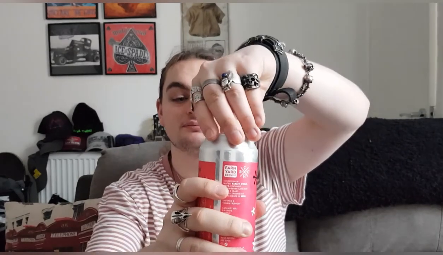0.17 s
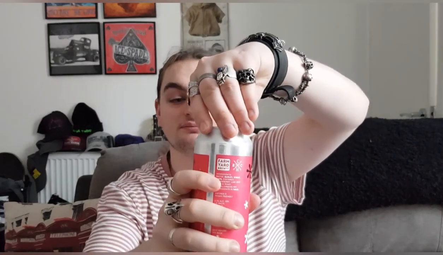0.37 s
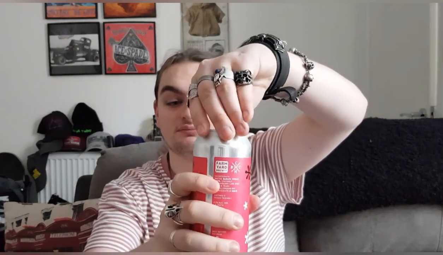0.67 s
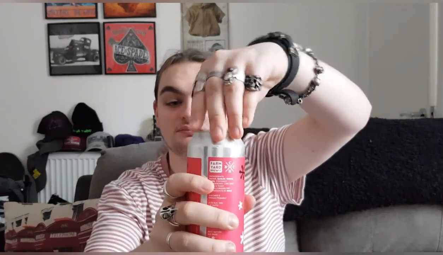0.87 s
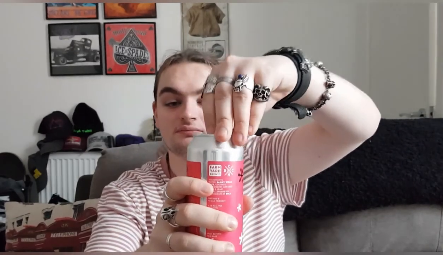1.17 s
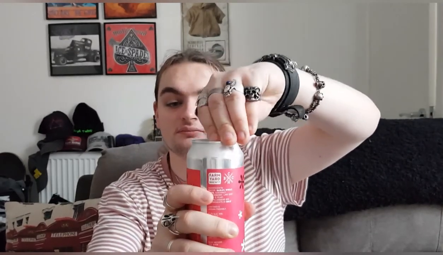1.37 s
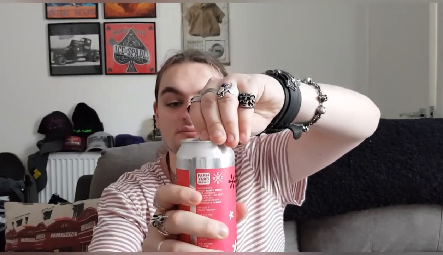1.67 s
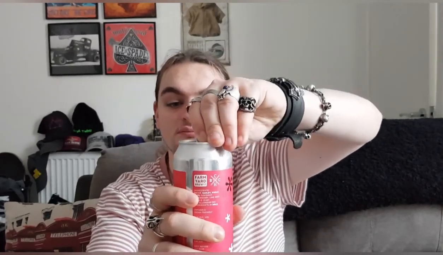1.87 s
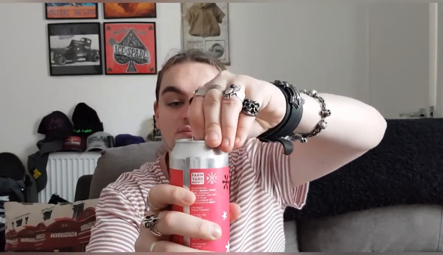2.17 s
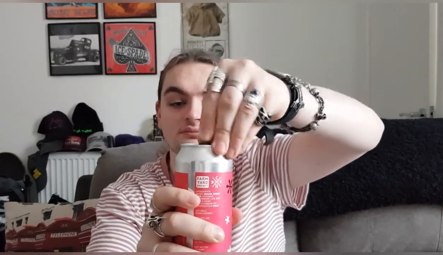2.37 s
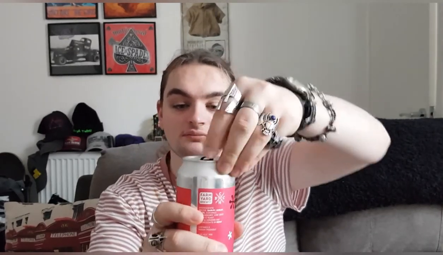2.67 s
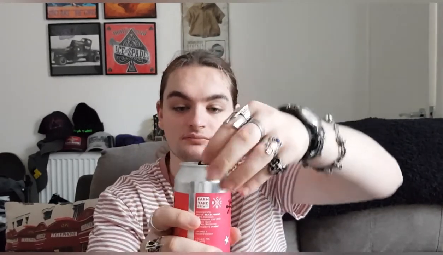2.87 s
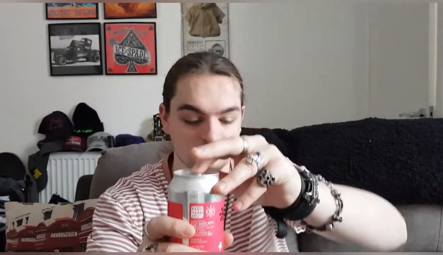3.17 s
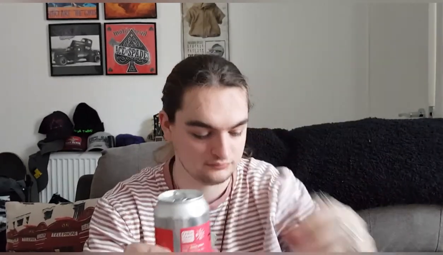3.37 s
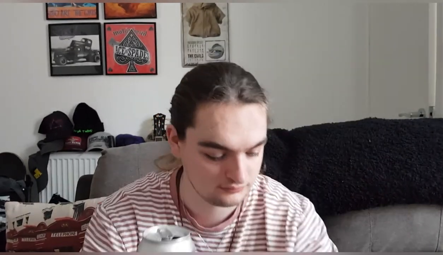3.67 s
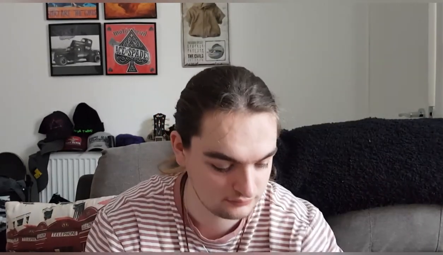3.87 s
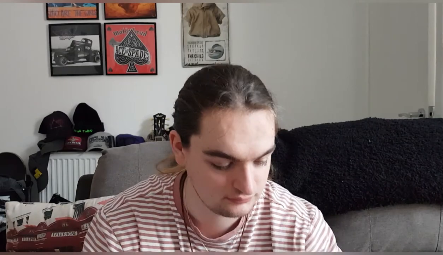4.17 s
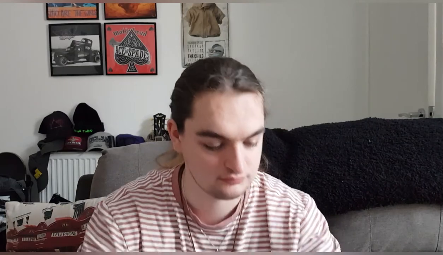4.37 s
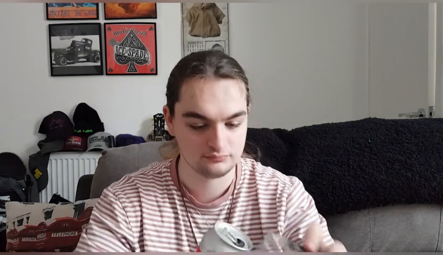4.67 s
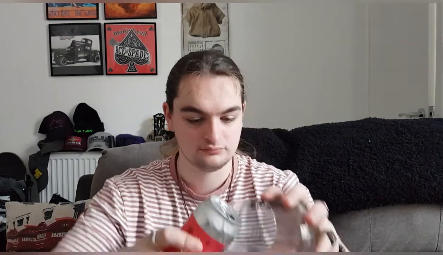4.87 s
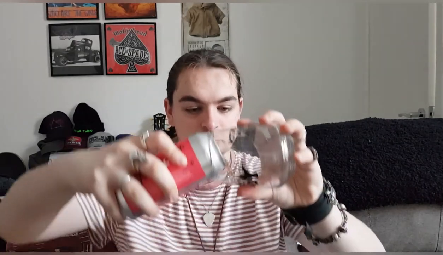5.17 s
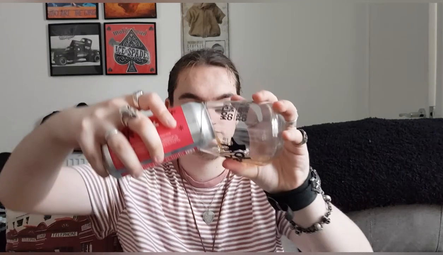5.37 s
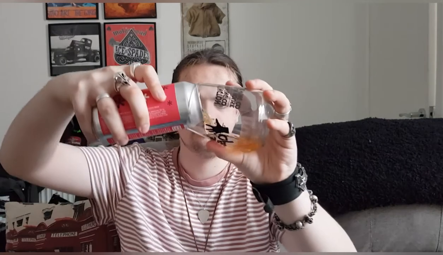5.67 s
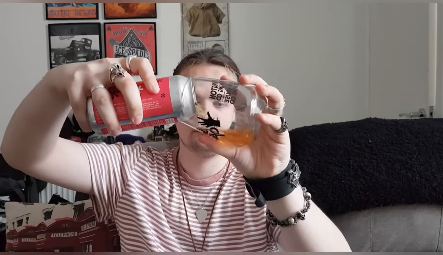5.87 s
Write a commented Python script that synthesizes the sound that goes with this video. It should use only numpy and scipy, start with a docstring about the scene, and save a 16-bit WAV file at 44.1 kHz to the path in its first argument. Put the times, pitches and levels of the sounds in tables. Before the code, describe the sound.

A phone about half a metre away picks up a can being opened: crisp crack with gas spitting out, a lone click, then a quick tearing snap and a slight fizz. Hollow metal taps and quiet rubbing follow, then a ringing double knock of can and glass, and gentle gurgling with one tiny splash. Short indoor reflections, faint hum, hiss and ticking.

```python
"""A small living room: a can of beer is opened half a metre from a phone, over a faint fan and a ticking clock.
Rough noise hits crack the seal and tear the lid; decaying modes ring as the panel snaps in; gas is fading noise.
Fingers tap and rub the can (clicks, ringing metal, hollow air, band noise), then it knocks against a glass.
Low rising tones glug as pouring begins, with one small splash; gear rattles tick over steady hum and hiss."""
import sys
import numpy as np
from scipy import signal
from scipy.fft import rfft, irfft, next_fast_len
from scipy.io import wavfile

SR = 44100
rng = np.random.default_rng(int(sys.argv[2]) if len(sys.argv) > 2 else 0)


def pcm_store(signal):
    """Save signal as 16-bit PCM."""
    levels = np.round(np.clip(np.atleast_2d(signal), -1, 1) * 32767)
    wavfile.write(sys.argv[1], SR, levels.astype(np.int16).T)


N = 264644
TIME = np.arange(N) / SR  # seconds into the scene
AGE = TIME[:SR // 2]  # seconds since a single sound began
SNAP_S = 1.9179  # the lid panel snaps in
TRICKLE_S = 5.1  # pouring begins
ROOM_T60_S = .38


def undb(db):
    """Decibels to gain."""
    return 10 ** (np.asarray(db) / 20)


def unit(x):
    """Scale to rms 1."""
    return x / np.sqrt(np.mean(x ** 2))


def blow(x, db):
    """Scale a hit so that its energy equals 5 ms at the given level."""
    return x * undb(db) * np.sqrt(.005 * SR / np.sum(x ** 2))


def fade(t60):
    """Exponential decay by 60 dB in t60 seconds."""
    return np.exp(-np.log(1000) * AGE / max(t60, 1e-4))


def add(track, s, x):
    """Mix a sound into the track at time s."""
    i = int(s * SR)
    track[:, i:i + x.shape[1]] += x[:, :N - i]


def colour(x, points, tilt_db=0):
    """Causal minimum-phase filter through (Hz, dB) points, tilted per octave, its peak gain set to 0 dB."""
    size = next_fast_len(x.shape[-1] + 4096)
    octave = np.log2(np.maximum(np.fft.rfftfreq(2 * size, 1 / SR), 1))
    hz, db = np.transpose(points)
    edges = np.log2(hz)
    gain_db = np.interp(octave, edges, db) + tilt_db * np.clip(octave, edges[0], edges[-1])
    gain_db -= 12 * np.maximum(edges[0] - octave, 0)  # 12 dB per octave cut below the first point
    # folding the cepstrum onto positive time makes the filter causal
    cepstrum = irfft(np.log(undb(gain_db - gain_db.max())))
    cepstrum[1:size] *= 2
    cepstrum[size + 1:] = 0
    return irfft(rfft(x, 2 * size) * np.exp(rfft(cepstrum)))[..., :x.shape[-1]]


def contact(t60, grit):
    """One sharp push and a short rough scrape; grit is the strength of the scrape against the push."""
    scrape = grit * blow(rng.standard_normal(len(AGE)) * fade(t60), 0)
    push = blow(1. * (AGE == 0), 0)
    return scrape + push


def ring(modes, tilt_db=0, scatter_db=0.0):
    """Decaying modes whose sign and strength are drawn per strike; a small body radiates no bass."""
    signs = rng.choice([-1, 1], len(modes))
    weights = signs * undb(scatter_db * rng.standard_normal(len(modes)))
    tones = np.zeros(len(AGE))
    for weight, (hz, db, t60) in zip(weights, modes):
        gain = weight * undb(db + tilt_db * np.log2(hz / 1000))
        tones += gain * fade(t60) * np.sin(2 * np.pi * hz * AGE)
    bass_cut = signal.butter(4, .88 * modes[0][0], "high", fs=SR, output="sos")
    return signal.sosfilt(bass_cut, tones)


def rattle(length, roughness):
    """Tiny uneven clicks that swell and die away."""
    clicks = rng.standard_normal(len(AGE)) * np.exp(roughness * rng.standard_normal(len(AGE)))
    return clicks * np.sin(np.pi * np.clip(AGE / length, 0, 1))


def two_ports(size, spacing_m=0.12):
    """Diffuse noise at two microphones: alike in the bass, unrelated in the treble."""
    likeness = np.sinc(2 * np.fft.rfftfreq(size, 1 / SR) * spacing_m / 343)  # 343 m/s: speed of sound
    mid = irfft(rfft(rng.standard_normal(size)) * np.sqrt(1 + likeness), size)
    side = irfft(rfft(rng.standard_normal(size)) * np.sqrt(1 - likeness), size)
    return np.array([mid + side, mid - side])


def room(dry, left_lag, pan_db, wet_db, t60):
    """Direct sound, near reflections and a short diffuse tail, the last two drawn afresh for every sound."""
    # first reflections off nearby surfaces: delay_s (before random spread), level_db, left_lag_samples
    echoes = [(.0055, -13.5, 0.5), (.0077, -9, -7), (0.0094, -17.5, 10), (0.0131, -6.5, -3),
              (.0205, -9.5, 10)]
    tail = two_ports(len(AGE)) * fade(t60) * np.clip((AGE - .004) / .004, 0, 1)
    response = undb(wet_db) * tail / np.sqrt(np.sum(tail ** 2) / 2)
    for delay, db, echo_lag in echoes:
        i = int(delay * SR * (1 + 0.043 * rng.standard_normal()))
        response[0, i + int(echo_lag)] += undb(db)
        response[1, i] += undb(db)
    # direct sound: lag in samples, positive pan is louder on the left
    response[0, left_lag] += undb(pan_db / 2)
    response[1, 0] += undb(-pan_db / 2)
    return signal.fftconvolve(dry[None], response, axes=1)


def background(hum_pan_db=9, wander=0.0022, spread_db=-7, shared_db=-1, air_pan_db=0.9):
    """A fan hums at its wandering turning rate and multiples of it, over room air and microphone hiss."""
    # fan whine: multiple_of_turning_rate, level_db
    fan_orders = [(4, -84), (5, -84.5), (6, -95.5), (7, -82.5), (9, -91), (12, -88), (14, -87), (16, -92),
                  (25, -89)]
    # room air and microphone hiss: pitch_hz, relative level_db
    floor_colour = [(30, -15), (60, 1.5), (110, -4.5), (230, -11), (420, -14.5), (700, -15.5), (900, -19.5),
                    (1500, -22.5), (3000, -27), (4700, -24.5), (6000, -29), (7500, -35.5), (9000, -32),
                    (12000, -17), (15500, -17)]
    fan_hz, hum_db, floor_db = 45.84, -71.5, -69.5  # mean turning rate; levels before panning
    dip_s, dip_width_s, dip_db = 3.67, 0.11, -16  # the lowest hum dips briefly once
    drift = np.interp(TIME, np.linspace(0, TIME[-1], 20), rng.standard_normal(20))
    turn = 2 * np.pi * np.cumsum(fan_hz * (1 + wander * drift)) / SR
    hum_level_db = hum_db + dip_db * np.exp(-((TIME - dip_s) / dip_width_s) ** 2)
    hum = np.sqrt(2) * np.sin(turn) * undb(hum_level_db)
    whine = np.zeros(N)
    for order, db in fan_orders:
        whine += np.sqrt(2) * undb(db) * np.sin(round(order) * turn + 2 * np.pi * rng.random())
    # part of the air noise differs between left and right, part is shared
    air = undb(spread_db) * rng.standard_normal((2, N)) + undb(shared_db) * rng.standard_normal(N)
    sides = np.array([[.5], [-.5]])
    hiss = undb(floor_db + air_pan_db * sides) * unit(colour(air, floor_colour))
    return hum * undb(hum_pan_db * sides) + whine + hiss


def clock():
    """Each step of the second hand rattles the gears in their case, heard mostly through the room."""
    # clock case: pitch_hz, relative level_db
    tick_colour = [(900, -13), (1400, 0.5), (2000, -3), (2600, -11.5), (3600, -14), (4200, -7.5),
                   (5400, -4.5), (6300, -10.5), (7500, -30)]
    first_s, period_s, length_s, tick_db = .265, 1, .06, -69
    out = np.zeros((2, N))
    for s in np.arange(first_s, TIME[-1], period_s):
        tick = blow(colour(rattle(length_s, roughness=0.95), tick_colour), tick_db)
        add(out, s, room(tick, left_lag=0, pan_db=2, wet_db=5.5, t60=ROOM_T60_S))
    return out


def rubs(roughness=0.375):
    """Fingers and clothes slip in tiny uneven catches, each slide swelling and dying away."""
    # slides: start_s, length_s, level_db (before the swell and room), centre_hz, width_hz
    slides = [(.83, 0.16, -71.5, 1300, 300), (0.885, 0.11, -70.5, 4670, 2800),
              (0.995, 0.023, -67.5, 3250, 350), (3.41, 0.12, -80, 1120, 200), (3.966, 0.22, -74.5, 230, 30),
              (4.659, 0.098, -72.5, 2440, 5130), (4.68, .11, -63, 750, 800)]
    out = np.zeros((2, N))
    for s, length, db, hz, width in slides:
        catches = rng.standard_normal(len(AGE)) * np.exp(roughness * rng.standard_normal(len(AGE)))
        low = np.hypot(hz, width / 2) - width / 2  # puts the centre at the geometric mean of the edges
        band = signal.butter(2, [low, low + width], "band", fs=SR, output="sos")
        slide = unit(signal.sosfilt(band, catches))
        swell = np.sin(np.pi * np.clip(AGE / length, 0, 1))
        add(out, s, room(undb(db) * swell * slide, left_lag=0, pan_db=2.5, wet_db=-1, t60=ROOM_T60_S))
    return out


def taps(tab_db=-11, air_t60=0.029, split=0.063):
    """Each tap clicks, rings the tab and sounds the hollow can, whose pitch rises as the opening widens."""
    # fingers and tab on the can, soft fingertips cut the treble:
    # start_s, click_db, tilt_db_per_octave, top_hz, contact_t60_s, air_level_db
    tap_hits = [(2.2418, -58, 3.5, 13700, 0.023, -69.5), (2.3452, -57, -3.5, 12000, 0.044, -53.5),
                (2.4486, -65, 6, 15000, .004, -64.5), (2.6147, -45, 1.5, 2900, 0.027, -35.5),
                (2.6949, -64, 0, 3000, .009, -63), (2.901, -41, -0.5, 13200, 0.011, -46),
                (3.088, -44, -3.5, 15000, 0.0015, -55.5), (3.1955, -64.5, -4, 2600, .006, -81),
                (3.7295, -72.5, 1, 5000, .009, -69.5), (3.86, -56, 9, 14800, 0.017, -55),
                (3.945, -60.5, 3.5, 13300, 0.0068, -82)]
    # tap on the lid: pitch_hz, relative level_db
    tap_colour = [(300, -55), (700, -27), (1000, 1.5), (1900, 3.5), (2800, 0.5), (3500, 4), (6400, 2.5),
                  (8300, -12.5), (10500, -7), (15500, -15)]
    # ring of the tab: pitch_hz, relative level_db, t60_s
    tab_modes = [(1840, 5, .049), (2140, 10, .03), (2800, 17.5, .033), (3350, 0, 0.044), (3700, 3, 0.034),
                 (4550, 3, .032), (5100, 10, .07), (6400, 1.5, 0.036), (7100, 0, .03)]
    ajar_hz, open_hz, opening_tau_s = 835, 1181, 0.58  # air resonance while the panel is pushed aside
    out = np.zeros((2, N))
    for s, db, tilt_db, top_hz, t60, air_db in tap_hits:
        click = blow(colour(contact(t60, grit=1.6), tap_colour, tilt_db), db)
        tab = blow(ring(tab_modes, tilt_db, scatter_db=1), db + tab_db)
        treble_cut = signal.butter(8, min(top_hz, SR * .45), fs=SR, output="sos")
        metal = signal.sosfilt(treble_cut, click + tab)
        air_hz = open_hz - (open_hz - ajar_hz) * np.exp(-(s - SNAP_S) / opening_tau_s)
        # two resonances, one either side of the air pitch
        air_modes = [(air_hz * (1 - split), 0, air_t60), (air_hz * (1 + split), 0, air_t60)]
        hollow = blow(ring(air_modes) * np.clip(AGE / 0.0019, 0, 1), air_db)
        add(out, s, room(metal + hollow, left_lag=1, pan_db=1.2, wet_db=3.0, t60=0.29))
    return out


def knocks():
    """Can and glass are picked up and meet with a clack; the hands damp their ring."""
    # knocks, the grip shifts their pitch:
    # start_s, ring_db, clack_db, tilt_db_per_octave, contact_t60_s, pitch_ratio
    knock_hits = [(3.8581, -48, -55, 7.5, 0.024, 1.017), (4.831, -26.5, -38, -1, .058, 0.99),
                  (4.8642, -28.5, -25.5, -0.5, 0.019, 1)]
    # ring of can and glass: pitch_hz (before the ratio), relative level_db, t60_s
    knock_modes = [(462, -14, 0.17), (505.4, -2.5, 0.1), (532, -8, .1), (1136, -4, 0.046),
                   (1170, -14, 0.12), (1524, -15.5, .15), (2097, -13.5, .084), (2767, -5.5, .16),
                   (2860, -17, 0.13), (3780, -19, .05), (5130, -5, .1), (5130, -5, .05), (7440, -16, 0.063),
                   (9620, -18, 0.046)]
    # clack of can on glass: pitch_hz, relative level_db
    clack_colour = [(70, -15), (150, -19), (330, -10), (700, -0.5), (1100, -5.5), (1500, 2), (2200, -4.5),
                    (3000, 4.5), (4300, -12.5), (6500, -11.5), (8500, -21), (12500, -18), (15500, -27)]
    out = np.zeros((2, N))
    for s, ring_db, clack_db, tilt_db, t60, pitch in knock_hits:
        modes = [(hz * pitch, db, decay) for hz, db, decay in knock_modes]
        clack = colour(contact(t60, grit=1.0), clack_colour, tilt_db)
        knock = blow(ring(modes, tilt_db), ring_db) + blow(clack, clack_db)
        add(out, s, room(knock, left_lag=3, pan_db=-1.5, wet_db=2, t60=0.27))
    return out


def flow():
    """Strength of the pour: each gulp swells, holds and dies away over a growing trickle."""
    # gulps out of the tilted can: start_s, level_db (before the room)
    gulps = [(5.16, -69.5), (5.41, -71.5), (5.67, -56), (5.87, -63)]
    attack_s, hold_s, gulp_t60_s = 0.017, 0.028, 0.25
    trickle_db, rise_db_per_s = -77.5, 15.5
    strength = (TIME > TRICKLE_S) * undb(trickle_db + rise_db_per_s * (TIME - TRICKLE_S))
    for s, db in gulps:
        released = np.maximum(TIME - s - attack_s - hold_s, 0)
        swell = np.clip((TIME - s) / attack_s, 0, 1)
        strength = strength + undb(db) * swell * np.exp(-np.log(1000) * released / gulp_t60_s)
    return strength


def pour(splash_s=5.683, splash_db=-56, splash_t60=0.34, glug_t60=0.11, rise=1.6, count=110):
    """Beer gulps out in many low glugs, each rising in pitch, and one small splash rings the glass."""
    # glugs inside the can: pitch_hz, relative level_db
    pour_colour = [(50, -5), (75, 5), (115, -10.5), (165, -0.5), (280, -5), (400, 0.5), (550, -8.5)]
    # glass rung by the splash: pitch_hz, relative level_db, t60_s
    splash_modes = [(2050, -1, 0.025), (2730, 1, 0.011), (3160, 5, 0.01), (3610, 2, 0.018),
                    (4530, 3, 0.0051)]
    glugs, out = np.zeros((1, N)), np.zeros((2, N))
    for when, pitch in rng.random((count, 2)):
        hz = np.geomspace(65, 430, 100)[int(100 * pitch)]  # starting pitch
        bubble = np.sin(2 * np.pi * hz * AGE * (1 + rise * AGE / 2)) * fade(glug_t60)
        add(glugs, TRICKLE_S + when * (TIME[-1] - TRICKLE_S), bubble[None])
    gurgle = colour(glugs[0], pour_colour)
    gurgle = gurgle / np.std(gurgle[TIME > TRICKLE_S]) * flow()
    add(out, 0, room(gurgle, left_lag=0, pan_db=3.5, wet_db=-3.5, t60=ROOM_T60_S))
    drops = rng.standard_normal(len(AGE)) ** 3 * fade(splash_t60)  # cubing makes a few drops stand out
    splash = blow(signal.fftconvolve(drops, ring(splash_modes)), splash_db)
    add(out, splash_s, room(splash, left_lag=0, pan_db=-1, wet_db=-14.0, t60=ROOM_T60_S))
    return out


def fizz(length=0.38, db=-55, hz=3800, width_hz=900):
    """Foam fizzes briefly inside the can once the panel is open: band-limited clicks that swell and die."""
    out = np.zeros((2, N))
    band = signal.butter(2, [hz - width_hz / 2, hz + width_hz / 2], "band", fs=SR, output="sos")
    foam = blow(signal.sosfilt(band, rattle(length, roughness=0.54)), db)
    add(out, SNAP_S, room(foam, left_lag=0, pan_db=-1.5, wet_db=4, t60=ROOM_T60_S))
    return out


def gas(start=.6005, spit_db=-20, spit_t60=.12, seep_db=-44, seep_t60=0.61):
    """Gas spits through the first slit; the pressure drops fast and the rest seeps out."""
    # escaping gas: pitch_hz, relative level_db
    gas_colour = [(500, -42), (1200, -25.5), (1900, -0.5), (3300, 6.5), (5600, -3), (7000, -4.5),
                  (8600, -13.5), (11000, -1.5), (15500, -13.5)]
    out = np.zeros((2, N))
    spit = blow(fade(spit_t60), spit_db)
    seep = blow(fade(seep_t60) * (1 - AGE / AGE[-1]), seep_db)
    hiss = unit(colour(rng.standard_normal(len(AGE)), gas_colour))
    jet = (spit + seep) * np.clip(AGE / 0.00064, 0, 1) * hiss
    add(out, start, room(jet, left_lag=1, pan_db=-0.5, wet_db=3.5, t60=0.37))
    return out


def tear(count, jitter=.5, scatter_db=2):
    """Small cracks run along the score, on average ever quicker and louder, up to the snap."""
    start_s, start_db, rise_db, tilt_db, quickening = 1.888, -37.5, 2.5, 4, 1.15
    progress = ((np.arange(count) + jitter * rng.random(count)) / count) ** (1 / quickening)
    small_cracks = []  # start_s, level_db, tilt_db_per_octave
    for p in progress - progress[0]:
        level_db = start_db + p * rise_db + scatter_db * rng.standard_normal()
        small_cracks.append((start_s + p * (SNAP_S - start_s), level_db, tilt_db))
    return small_cracks


def lid():
    """The lid gives way in cracks under the tab; the freed panel snaps in and thumps the air in the can."""
    # cracks: start_s, level_db, tilt_db_per_octave
    cracks = [(0.5975, -19, -1.5), (0.606, -30.5, 12), (0.9336, -65.5, -5), (1.0013, -68.5, 10),
              (1.464, -39, -2.5), (1.9065, -22.5, 0.5)]
    # crack of thin aluminium: pitch_hz, relative level_db
    crack_colour = [(200, -39), (600, -35), (1200, -21), (2000, -11), (3000, -7.5), (3700, 1.5),
                    (4700, 4.5), (5700, 0.5), (7000, -16), (8700, -24.5), (11000, -17.5), (15500, -21.5)]
    # click of the panel: pitch_hz, relative level_db
    snap_colour = [(200, -38), (320, -30.5), (450, -13.5), (680, -0.5), (1000, -3.5), (1500, -5),
                   (2100, -5), (3000, -2.5), (3700, 5), (4800, -7.5), (5900, -2.5), (8300, -20),
                   (11500, -13.5), (15500, -26.5)]
    # thump and ring of the panel: pitch_hz, relative level_db, t60_s
    snap_modes = [(520.7, -13, 0.021), (630, -8, .035), (730.6, -4.5, 0.04), (834, 1.5, .042),
                  (990, -7, 0.059), (1200, -10, .015), (1560, -9, .025), (3510, -4.5, 0.056),
                  (3804, -7.5, .07)]
    out = np.zeros((2, N))
    for s, db, tilt_db in cracks + tear(count=8):
        crack = blow(colour(contact(t60=.009, grit=0.61), crack_colour, tilt_db), db)
        add(out, s, room(crack, left_lag=1, pan_db=-3.5, wet_db=3.5, t60=0.33))
    click = blow(colour(contact(t60=0.0062, grit=1.8), snap_colour), db=-17.5)
    thump = blow(ring(snap_modes), db=-19)
    add(out, SNAP_S, room(click + thump, left_lag=0, pan_db=-2.5, wet_db=3.0, t60=0.32))
    return out


def scene():
    """Opening, handling and pouring close to the phone, over the clock and the fan."""
    return lid() + gas() + fizz() + taps() + rubs() + knocks() + pour() + clock() + background()


def record(dry):
    """Sets the stereo width by pitch, wide in bass and mids, narrower in the treble, and removes the top."""
    # stereo width: pitch_hz, side_db
    side_width = [(100, 2.5), (250, 4), (500, 3), (1500, 2), (5000, 1.5), (8000, -3), (13000, -2.5)]
    hz, db = np.transpose(side_width)
    width = undb(np.interp(np.log(np.fft.rfftfreq(N, 1 / SR) + 1), np.log(hz), db))
    mid = (dry[0] + dry[1]) / 2
    side = irfft(rfft(dry[0] - dry[1]) / 2 * width, N)
    top_cut = signal.ellip(10, .2, 70, 15950, fs=SR, output="sos")  # ripple dB, stopband dB, top Hz
    return signal.sosfilt(top_cut, np.array([mid + side, mid - side]))


dry = scene()
out = record(dry)
pcm_store(out)
```